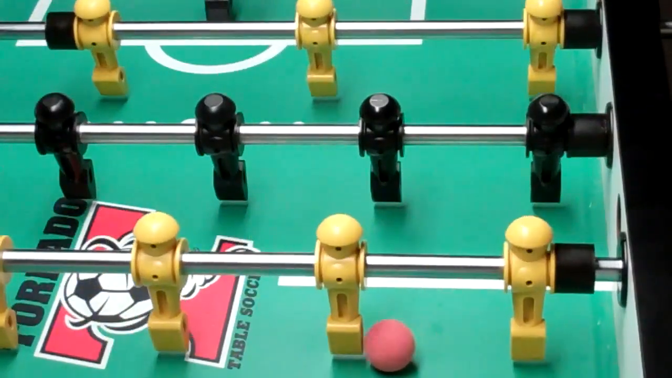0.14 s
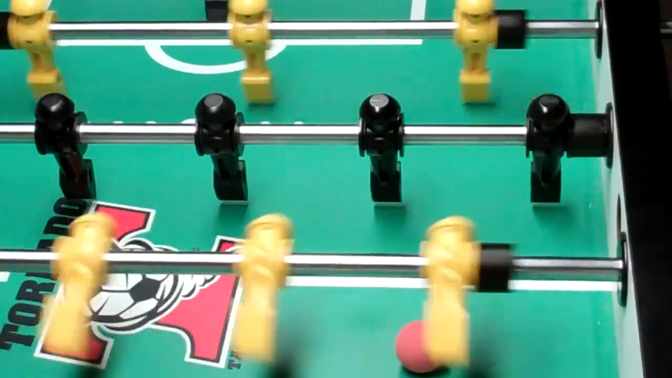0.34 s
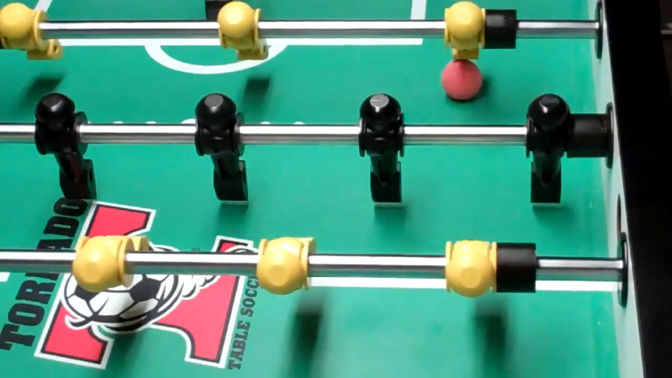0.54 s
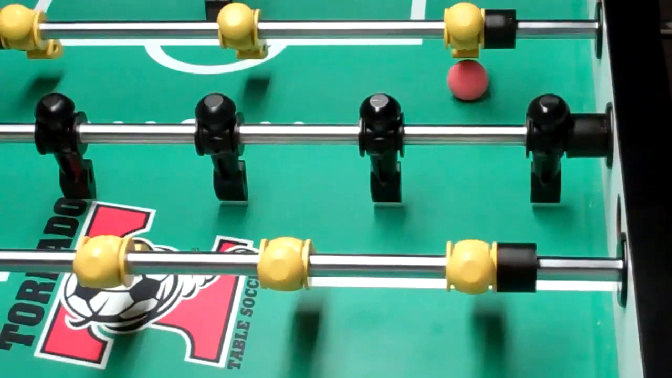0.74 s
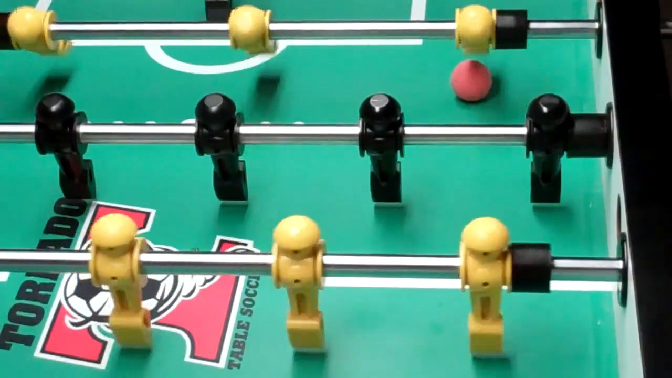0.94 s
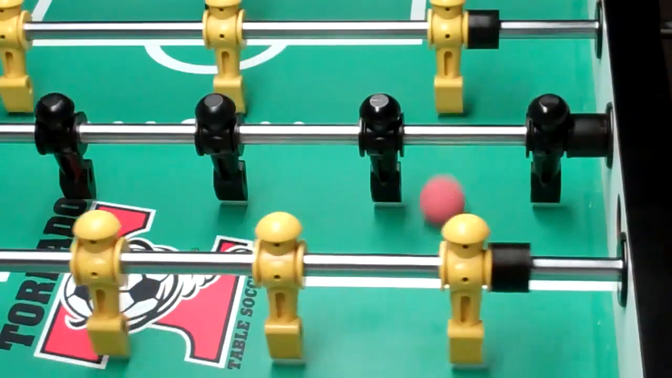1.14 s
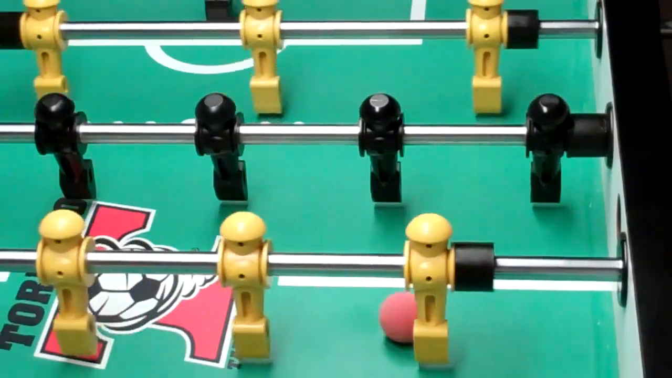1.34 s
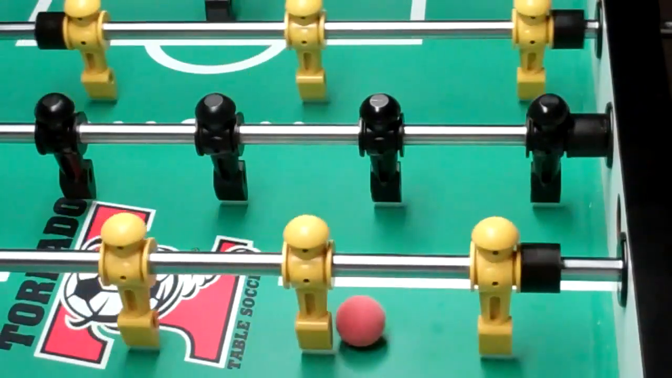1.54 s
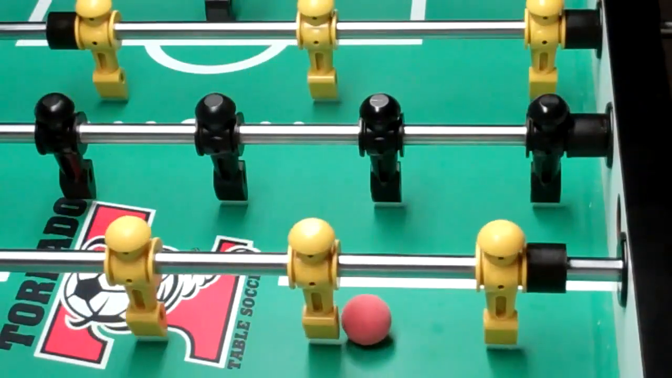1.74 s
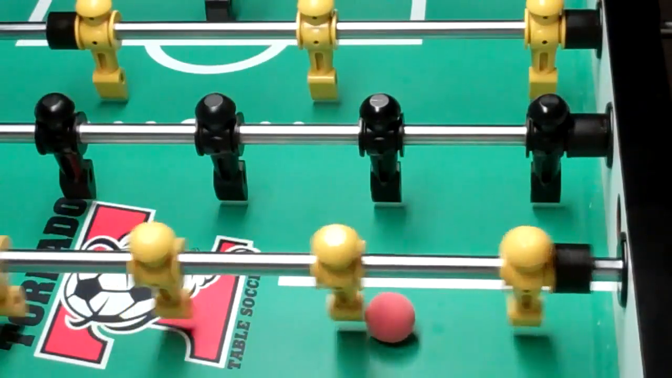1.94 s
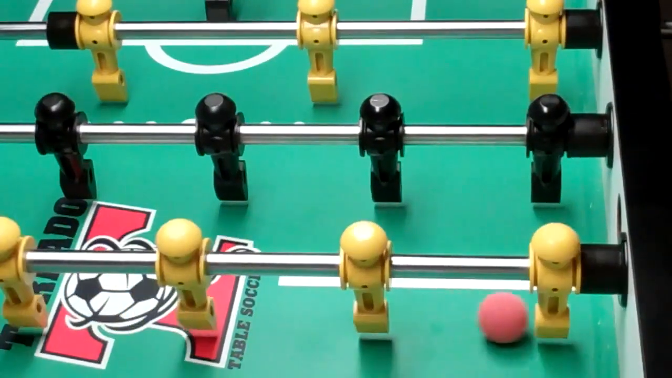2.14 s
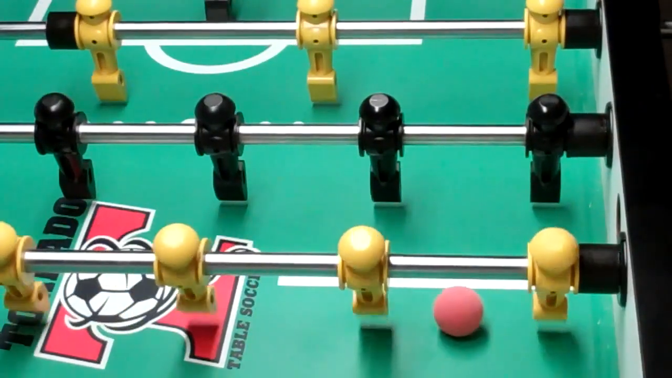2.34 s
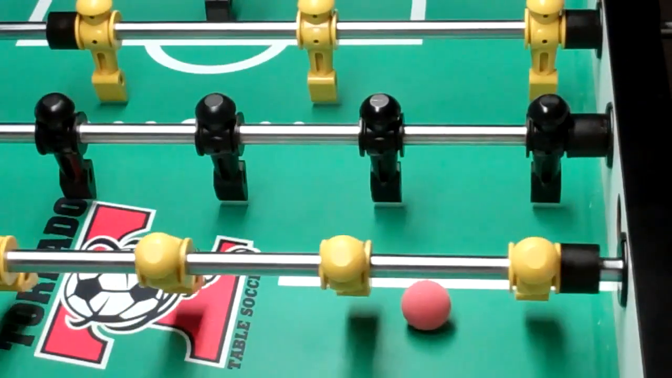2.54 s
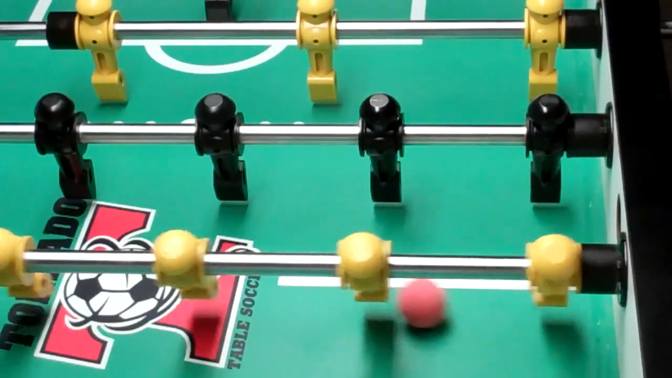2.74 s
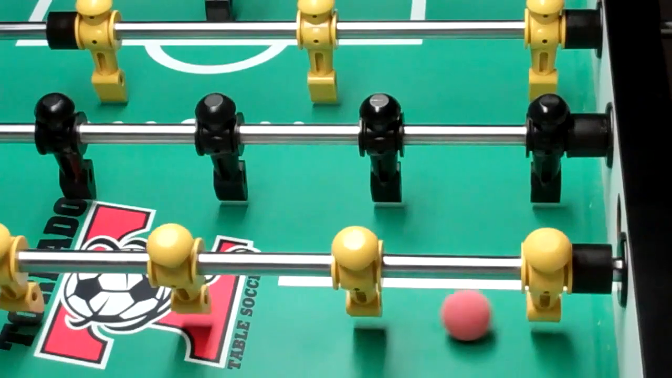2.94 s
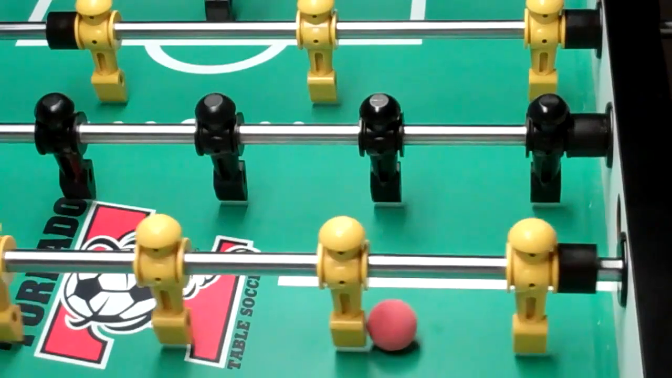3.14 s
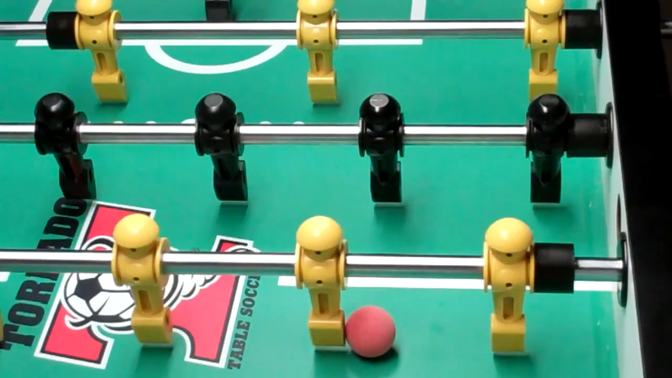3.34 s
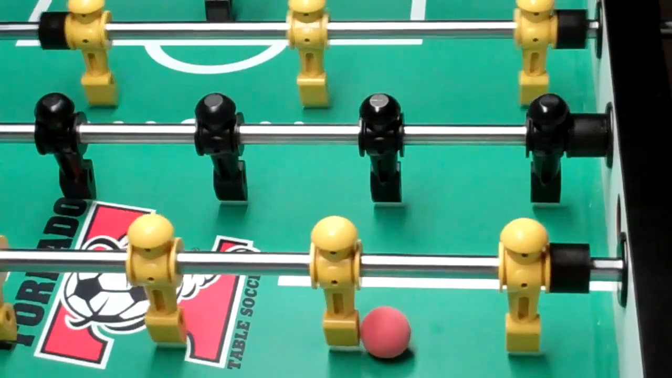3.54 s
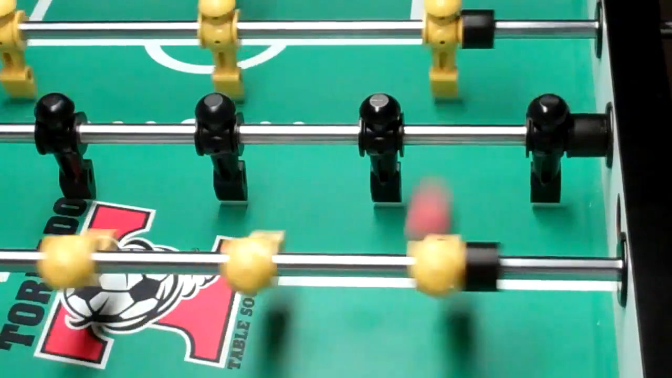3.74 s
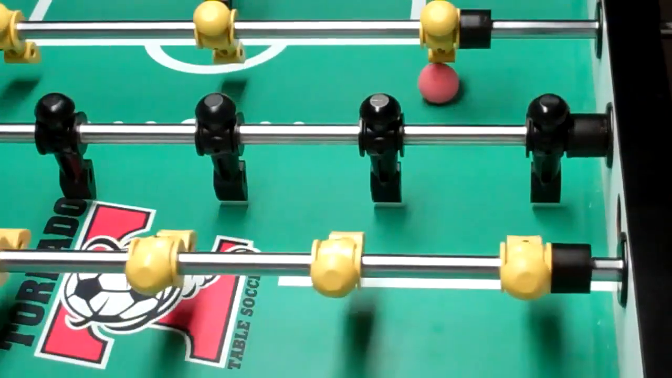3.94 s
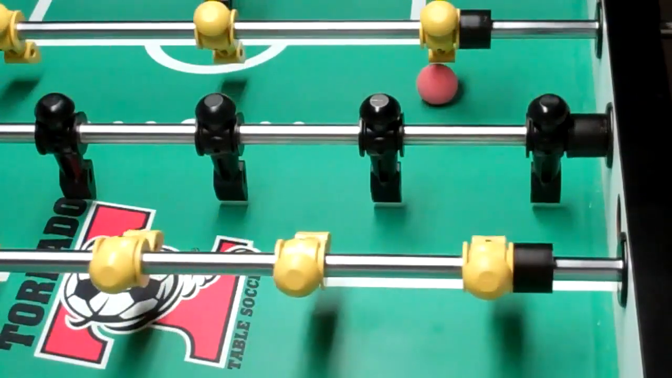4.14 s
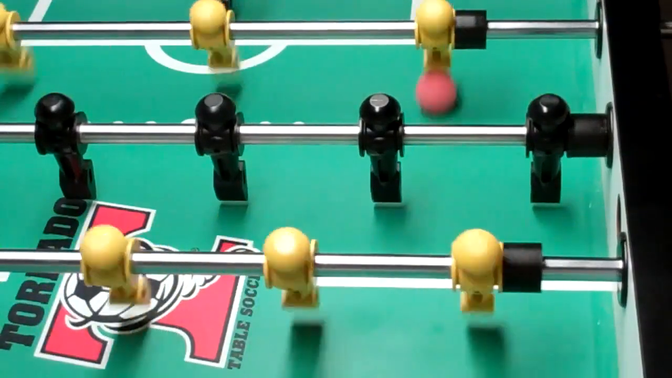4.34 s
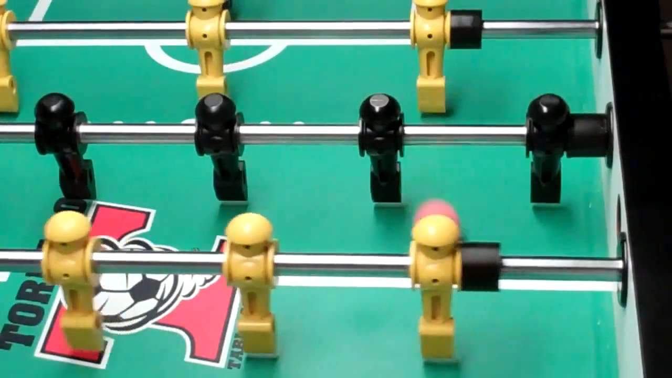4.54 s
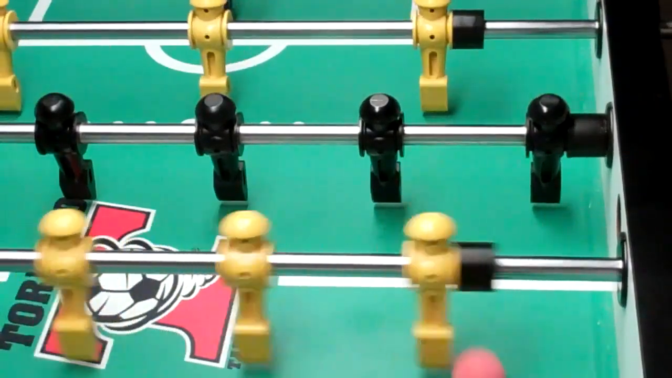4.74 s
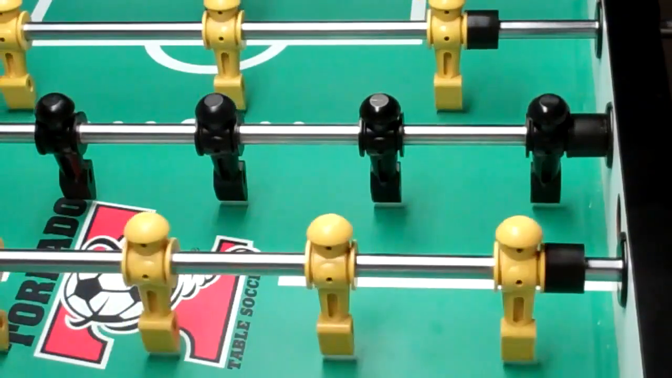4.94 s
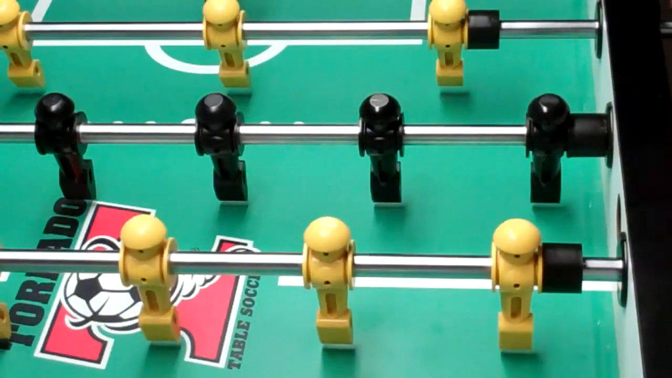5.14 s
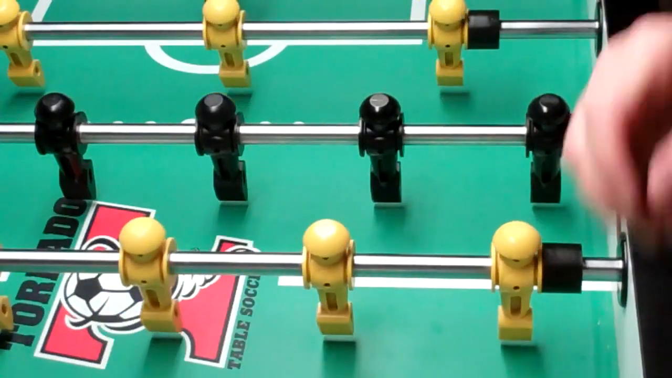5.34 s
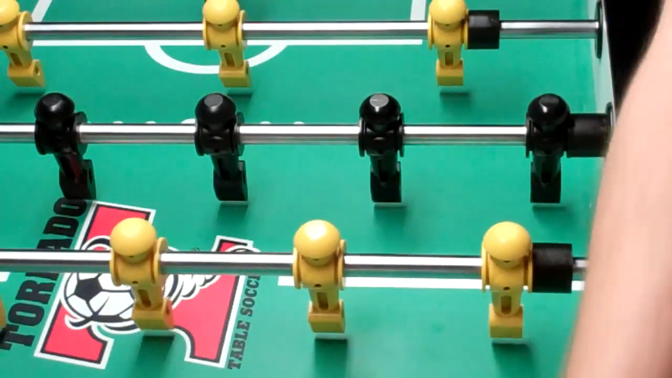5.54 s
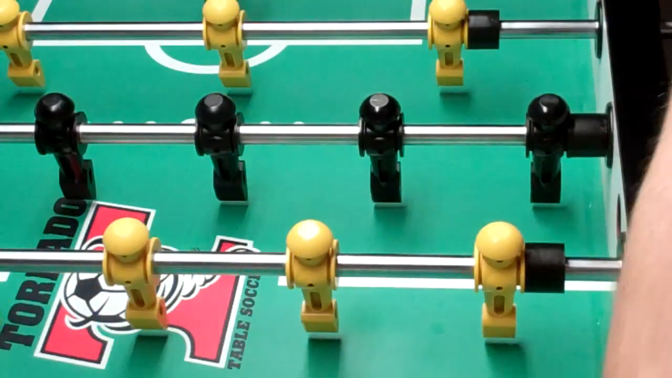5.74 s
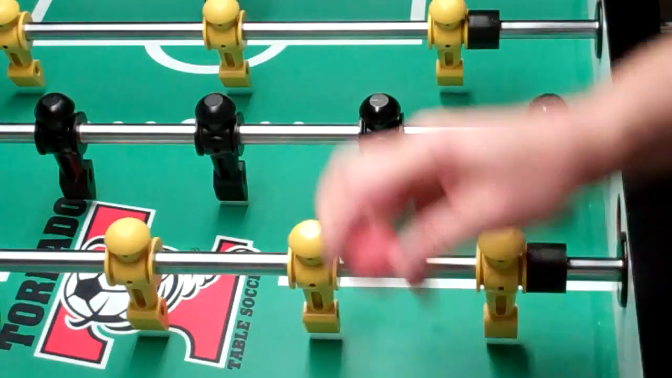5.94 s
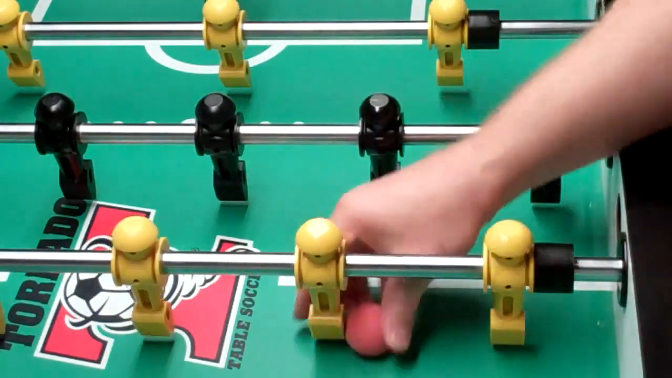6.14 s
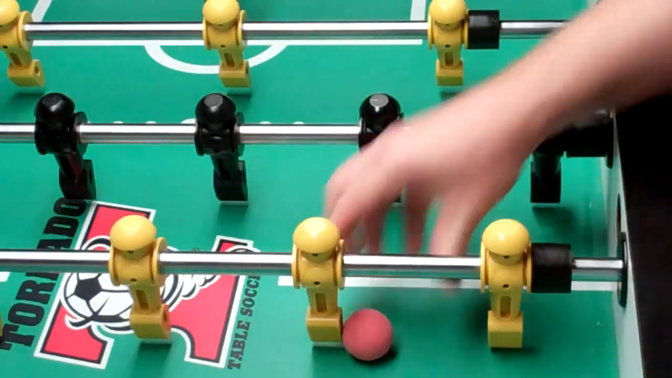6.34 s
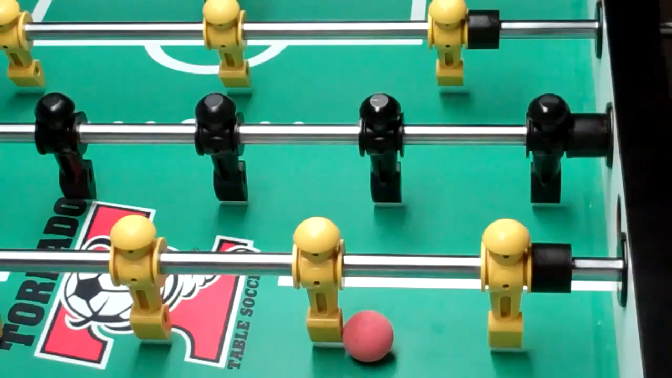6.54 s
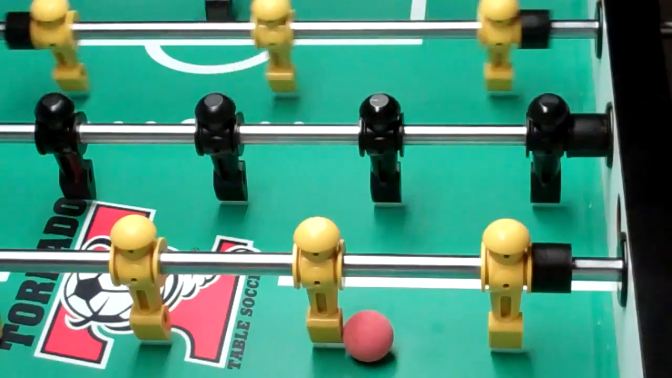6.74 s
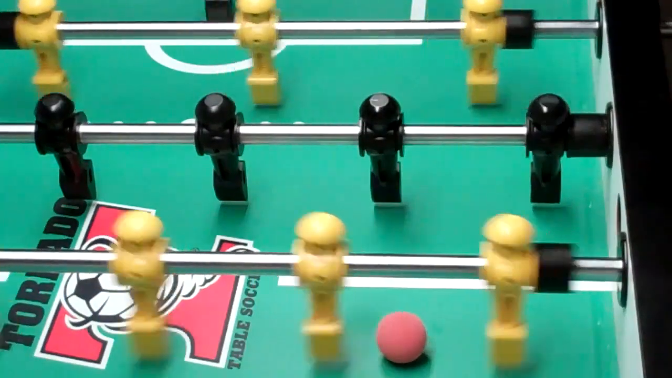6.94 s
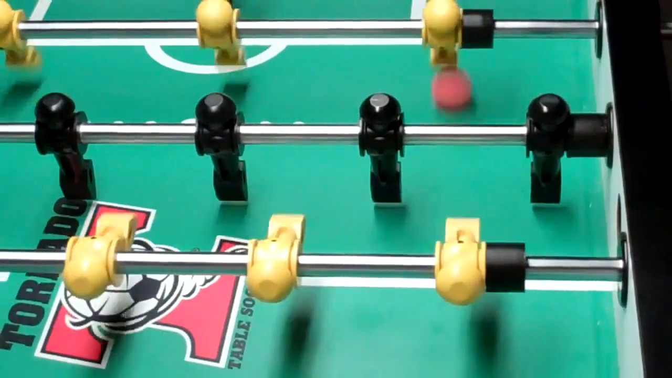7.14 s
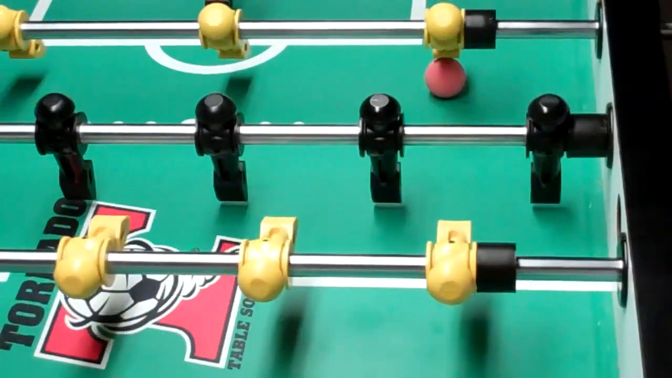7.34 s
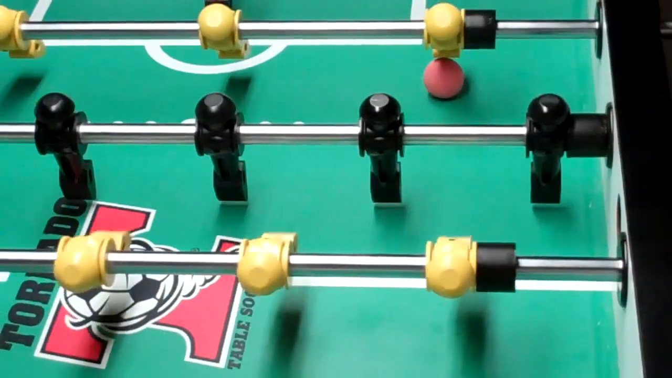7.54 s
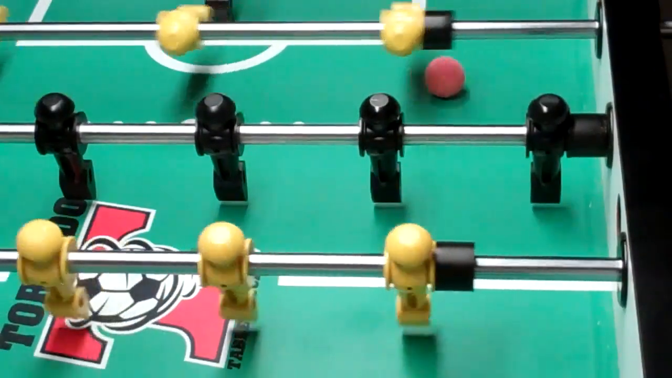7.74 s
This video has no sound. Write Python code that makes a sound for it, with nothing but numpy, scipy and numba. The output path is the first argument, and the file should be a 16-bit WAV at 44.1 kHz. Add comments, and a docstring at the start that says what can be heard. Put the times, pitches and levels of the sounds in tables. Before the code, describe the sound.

Light rod taps lead into two hard, clicking hits almost together, the wooden table ringing beneath. Steel rods clatter and hiss in their bearings while the ball is positioned, then another double strike and a fading roll. After a lull with faint knocks, skin rustles as the ball is replaced with a tap, rods rattle and a final pair of cracks lands. Close phone pickup in a small quiet room, briefly ducking after hits.

```python
"""Quiet room, table football close to a phone: plastic figures kick a hard ball over a hollow wooden table.
Kicks are clicks and rings of close modes; steel rods knock and tick in their bearings as rattled mode clusters.
Sliding rods and the rolling ball are friction grains through the table's modes; a slow rod sings on a rod mode.
A hand puts the ball back (grainy bright noise); room tone is coloured noise and two faint hums.
The phone's gain control ducks after each loud kick."""
import sys
import numpy as np
from scipy import signal
from scipy.fft import rfft, irfft, next_fast_len
from scipy.io import wavfile
from scipy.ndimage import uniform_filter1d
from numba import njit

SR = 44100
rng = np.random.default_rng(int(sys.argv[2]) if len(sys.argv) > 2 else 0)


def generate_wav(signal):
    """Clip the signal to [-1, 1] and save it as 16-bit WAV at the path in sys.argv[1]."""
    frames = np.transpose(np.atleast_2d(signal))
    scaled = np.clip(frames, -1, 1) * 32767
    pcm = np.round(scaled).astype(np.int16)
    wavfile.write(sys.argv[1], SR, pcm)


N = 342657

# ball against figure, wall or field: start_s, crack_db, crack_hz, snap_db, clatter_db,
# table_db, table_centre_hz, table_t60_s (at 500 Hz), thud_db
KICK_EVENTS = [(0.5275, 10.5, 3570, -7, -19, -2, 650, 0.1, -25),
               (0.609, 12.5, 2130, -6.5, -13, -4, 1210, 0.18, -26.5),
               (1.0903, -4, 1760, -35, -12.5, -11, 570, .16, -12.5),
               (1.4472, -17.5, 4200, -34, -25, -15.5, 790, 0.29, -29),
               (3.846, 8, 3800, -6, -16, -3, 620, 0.061, -24.5),
               (3.93, 11, 2134, -10, -20.5, -1.5, 1175, .12, -19.5),
               (4.4669, 1, 1840, -26.5, -22, -9, 555, 0.14, -21.5),
               (5.533, -6, 2325, -27.5, -17, -35, 1230, 0.52, -42.5),
               (6.0241, -20.5, 2700, -19, -26.5, -40, 1270, 0.085, -40.5),
               (6.2558, -0.5, 1637, -28.5, -26, -10.5, 850, 0.15, -31),
               (7.194, 9.5, 4530, -5, -20, -2.5, 650, 0.061, -26),
               (7.278, 9, 2256, -8.5, -14, -1.5, 1154, 0.12, -24.5)]
# resonances of the wooden table: centre_hz, half_width_hz, level_db
TABLE_MODES = [(140, 24, -9), (261.2, 5.6, -6.5), (339, 60, -11.5), (423, 50, -5), (522.5, 40, -9.5),
               (621.4, 56, 0), (742.6, 38, -3), (890.3, 80, -1.5), (1123.7, 84, -3), (1244.5, 170, -3),
               (1503, 110, -5.5), (1726, 15, -8.5), (1950, 53, -6), (2340, 160, -10.5), (2560, 83, -15),
               (3100, 570, -19.5)]
# resonances of a steel rod: centre_hz, half_width_hz, level_db
ROD_MODES = [(474.8, 30, -3.5), (1047, 87, -1), (2220, 38, -13), (2290, 64, -12), (2550, 30, -22),
             (3040, 60, -28), (4180, 52, -24.5), (4510, 54, -32.5)]


def undb(db):
    """dB to gain."""
    return 10 ** (np.asarray(db) / 20)


def unit(x):
    """Scaled to rms 1."""
    return x / np.sqrt(np.mean(x ** 2))


def colour(x, points):
    """Shapes the spectrum by (Hz, dB) points joined over log frequency."""
    size = next_fast_len(x.shape[-1])
    hz, db = np.transpose(points)
    bin_hz = np.arange(size // 2 + 1) * SR / size
    gain = undb(np.interp(np.log(bin_hz + 1), np.log(hz), db))
    return irfft(rfft(x, size) * gain, size)[..., :x.shape[-1]]


def band(x, lo_hz, hi_hz):
    """Band-pass, upper edge at most 0.45 SR."""
    sos = signal.butter(2, [lo_hz, min(hi_hz, 0.45 * SR)], "band", fs=SR, output="sos")
    return signal.sosfilt(sos, x)


def fade(t_s, t60_s):
    """Exponential decay, 60 dB in t60_s."""
    return np.exp(-np.log(1000) * t_s / t60_s)


def walk(rate_hz):
    """Random levels drawn at rate_hz, slewed from one to the next; spread near 1."""
    hold = int(SR / rate_hz)
    steps = np.repeat(rng.standard_normal(N // hold + 1), hold)
    return uniform_filter1d(steps, hold)[:N]


def hump(peak_s, rise_s, fall_s):
    """Gain that swells to 1 at peak_s and fades, 24.5 dB over the rise and over the fall."""
    t = np.arange(N) / SR
    return undb(-24.5 * np.maximum((peak_s - t) / rise_s, (t - peak_s) / fall_s))


def ring(peaks, centre_hz, t60_s, octaves=1.5, count=5):
    """One blow: clusters of close modes, loudest near the centre; high ones die first (t60_s at 500 Hz)."""
    hz, half_width_hz, db = np.transpose(peaks)[:, :, None, None]
    t = np.arange(int(min(1.3 * t60_s, 0.3) * SR)) / SR
    spot, size = rng.uniform(-1, 1, (2, len(peaks), count, 1))
    focus_db = -6 * (np.log2(hz / centre_hz) / octaves) ** 2
    weight = undb(db + focus_db) * np.sign(size) * (0.6 + 0.4 * np.abs(size))
    mode_hz = hz + spot * np.maximum(half_width_hz, 0.021 * hz)
    clusters = np.sum(weight * np.sin(2 * np.pi * mode_hz * t), axis=1)
    y = np.sum(clusters * fade(t, t60_s * (hz[:, 0] / 500) ** -0.3), axis=0)
    return y / np.sqrt(np.sum(weight ** 2))


def add(out, start_s, x):
    """Mixes x into out at start_s."""
    i = int(start_s * SR)
    out[i:i + len(x)] += x[:N - i]


def air():
    """Room tone: wavering coloured noise, wider in the treble, with two faint wavering hums."""
    # noise spectrum: hz, relative_db
    air_shape = [(15, -34), (25, -1.5), (87, -36), (108, -22), (165, -13), (193, -16), (303, -12.5),
                 (395, -21), (1030, -18), (1140, -20), (1840, -25), (14200, -24)]
    # side channel against mid: hz, side_gain_db
    side_shape = [(60, -17), (250, -9.5), (1000, -2), (4000, 4), (12000, 1)]
    # hums, each wavering around its level: hz, rms_db
    hums = [(120, -72), (166, -76.5)]
    t = np.arange(N) / SR
    mid, side = colour(rng.standard_normal((2, N)), air_shape)
    scale = undb(-58.5 + walk(2.4)) / np.std(mid)
    side = colour(side, side_shape)
    hum = 0
    for hz, db in hums:
        hum = hum + undb(db + 2 * walk(3)) * np.sqrt(2) * np.sin(2 * np.pi * hz * t)
    return scale * np.array([mid + side, mid - side]) + hum


def motion():
    """Gains of rumble, hiss and sway: slides swell and fade, rolls start and stop, kicks jolt the cabinet."""
    # constant floor under all motion: rumble_db, hiss_db, sway_db
    rest_db = (-74.5, -65.5, -72)
    # rods pushed through their bearings: fastest_s, rise_s, fall_s, rumble_db, hiss_db, sway_db
    slides = [(0.48, 0.26, 0.087, -45, -47.5, -58), (0.97, 0.074, 0.33, -45, -52.5, -73),
              (1.48, 0.025, 0.089, -47, -41, -63), (2.162, 0.046, 0.079, -54.5, -30.5, -38.5),
              (2.94, 0.1, 0.13, -37.5, -42.5, -42.5), (3.8, 0.1, 0.095, -29.5, -38, -47),
              (4.372, 0.055, .08, -48.5, -53, -70), (4.85, 0.071, .08, -72, -63, -51),
              (5.07, 0.088, .12, -45, -53.5, -61.5), (6.831, 0.071, 0.073, -25, -33.5, -43),
              (7.12, 0.11, 0.21, -40, -46, -56), (7.76, 0.37, 0.12, -59, -50, -71.5)]
    # the ball rolling: start_s, length_s, start_rumble_db, end_rumble_db
    rolls = [(0.518, 0.15, -26, -22), (0.626, 0.32, -54.5, -56), (1.1, 0.73, -39.5, -61.5),
             (3.05, 0.23, -56, -75), (3.846, 0.086, -17.5, -42), (3.933, 0.26, -32, -62),
             (4.46, 1.42, -41.5, -61), (6.297, 0.24, -61.5, -64), (6.9, 0.39, -59, -35),
             (7.201, 0.073, -32, -42), (7.3, 0.27, -29, -67)]
    roll_edge_s, roll_hiss_db = 0.029, -19  # hiss relative to rumble
    jolt_db, jolt_t60_s = -39, 0.24  # relative to the kick's table ring
    t = np.arange(N) / SR
    gains = undb(rest_db)[:, None] * np.ones(N)
    for peak_s, rise_s, fall_s, *db in slides:
        gains = gains + undb(db)[:, None] * hump(peak_s, rise_s, fall_s)
    for start_s, length_s, start_db, end_db in rolls:
        stop_s = start_s + length_s
        on = np.clip(np.minimum(t - start_s, stop_s - t) / roll_edge_s + 0.5, 0, 1)
        roll = on * undb(np.interp(t, [start_s, stop_s], [start_db, end_db]))
        gains = gains + roll * np.array([[1], [undb(roll_hiss_db)], [0]])
    for start_s, _, _, _, _, table_db, *_ in KICK_EVENTS:
        add(gains[2], start_s, undb(table_db + jolt_db) * fade(t[:SR // 2], jolt_t60_s))
    return gains


def rub():
    """Uneven grains of friction shake the table, hiss on the steel and rock the cabinet."""
    # friction hiss spectrum: hz, gain_db
    hiss_shape = [(1500, -12), (2200, -5.5), (3600, -10), (5000, -10), (8000, -7), (12000, -4.5),
                  (15000, -10)]
    rumble_gain, hiss_gain, sway_gain = motion()
    rumble = 0
    # the contact wanders over the board, so different groups of modes take turns
    for centre_hz in (390, 620, 950):
        grains = rng.standard_normal(N) * rumble_gain * undb(6.2 * walk(60) + 3.5 * walk(14))
        body = ring(TABLE_MODES, centre_hz, 0.097, octaves=0.68, count=8)
        body = body / np.sqrt(np.sum(body ** 2))
        rumble = rumble + 0.48 * signal.fftconvolve(grains, body)[:N]
    grainy = band(rng.standard_normal(N), 870, 8300) * undb(2.3 * walk(150))
    hiss = unit(colour(grainy, hiss_shape))
    sway = unit(band(rng.standard_normal(N), 25, 80))
    return rumble + hiss_gain * hiss + sway_gain * sway


def knocks():
    """A short rattle of contacts rings rod and table; metal ticks and scrapes on the bearing."""
    # rods knocking in their bearings, soft touches of the ball:
    # start_s, ring_db, ring_centre_hz, tick_db, rattle_ms
    knock_events = [(0.295, -22, 574, -66.5, 7.3), (0.32, -24, 546, -43.5, 13), (0.386, -21, 497, -53, 18),
                    (0.432, -25, 436, -42, 17), (0.477, -16, 595, -43, 11), (0.958, -31.5, 480, -55.5, 9.2),
                    (0.996, -38.5, 585, -62, 25), (1.084, -28, 900, -59, 5), (1.451, -10, 1254, -25, 21),
                    (1.657, -21.5, 616, -55, 25), (1.801, -31, 520, -67.5, 13.3),
                    (1.478, -14, 1298, -43, 13), (2.088, -21, 494, -32, 14),
                    (2.121, -13.5, 498, -28.5, 4.7), (2.143, -20.5, 261, -24.5, 7.8),
                    (2.151, -8.5, 640, -30, 28), (2.269, -14.5, 1090, -30.5, 22.6),
                    (2.865, -16.5, 474, -30, 7.1), (2.917, -16.5, 440, -34, 17),
                    (3.008, -13.5, 1053, -26, 23.5), (3.28, -34.5, 479.5, -64, 16),
                    (3.387, -44, 477, -71, 8.3), (3.633, -21, 487, -41, 9.6), (3.724, -15.5, 479, -37, 9.5),
                    (3.758, -12.5, 477, -30.5, 18), (3.8, -17, 457, -35, 24), (4.317, -39.5, 398, -66, 16),
                    (4.376, -28, 435, -56, 16), (4.614, -26.5, 495, -48, 14),
                    (4.924, -33.5, 593, -67.5, 12), (5.036, -26, 560, -49, 13),
                    (5.31, -25.5, 637, -46.5, 11.3), (5.498, -41, 1500, -50.5, 8.3),
                    (5.608, -26.5, 500, -53.5, 16), (5.727, -43.5, 995, -52, 8.6),
                    (5.772, -41.5, 444, -45, 33), (5.945, -44, 590, -38.5, 16), (6.38, -36.5, 866, -55, 10),
                    (6.54, -33.5, 472, -72, 8.2), (6.778, -13, 483, -39, 27),
                    (6.805, -13.5, 393, -34.5, 20), (6.961, -21.5, 470, -45, 7.3),
                    (7.052, -20.5, 500, -42.5, 6.8), (7.084, -24.5, 423, -40.5, 16),
                    (7.145, -20, 486, -46, 28), (7.495, -50, 600, -53, 3)]
    rod_share, scrape_db = 0.51, -14.5  # rod's part of the ring; scrape relative to tick
    out, t = np.zeros(N), np.arange(int(0.2 * SR)) / SR
    bodies = (rod_share, ROD_MODES, 0.1), (1 - rod_share, TABLE_MODES, 0.08)
    for start_s, db, centre_hz, tick_db, rattle_ms in knock_events:
        noise = rng.standard_normal((3, len(t)))
        swell = (t + 0.001) * np.exp(-t * 3000 / rattle_ms)
        rattle = noise[0] * swell / np.sqrt(np.sum(swell ** 2))
        rattle[0] = 0.44  # the first contact
        for share, peaks, t60_s in bodies:
            body = ring(peaks, centre_hz, t60_s, octaves=1.2, count=9)
            add(out, start_s, undb(db) * share * signal.fftconvolve(body, rattle))
        tick = unit(band(noise[1], 1300, 4400)) * fade(t, 0.0063 + 0.0048 * rattle_ms)
        scrape = unit(band(noise[2], 6100, 19000)) * fade(t, 0.014 + 0.0043 * rattle_ms)
        add(out, start_s, undb(tick_db) * tick)
        add(out, start_s, undb(tick_db + scrape_db) * scrape)
    return out


def kicks():
    """A click rings the hard plastic for a few cycles; a broad snap, loose parts clatter, the table rings."""
    # resonances of a plastic figure: centre_hz, half_width_hz, level_db
    figure_modes = [(1394, 220, -1), (1995, 250, 0), (2697, 150, -5), (3520, 380, -5), (4480, 370, -4.5),
                    (5070, 440, -1.5), (6220, 560, -11)]
    crack_t60_s = 0.031
    thud_hz, thud_t60_s = 175, 0.065  # the hollow of the cabinet
    out, t = np.zeros(N), np.arange(int(0.25 * SR)) / SR
    impulse = np.eye(1, len(t))[0]
    for start_s, db, hz, snap_db, clatter_db, table_db, centre_hz, t60_s, thud_db in KICK_EVENTS:
        noise = rng.standard_normal((2, len(t)))
        crack = ring(figure_modes, hz, crack_t60_s, octaves=0.89, count=10)
        click = band(impulse, 0.25 * hz, 1.85 * hz)
        snap = unit(band(noise[0], 4400, 0.45 * SR)) * fade(t, 0.01)
        loose = band(noise[1], 0.3 * hz, 1.4 * hz)
        loose = band(loose, 300, 1.5 * hz)
        loose = band(loose, 200, 1.2 * hz)
        clatter = unit(loose) * fade(t, 0.15)
        add(out, start_s, undb(db) * crack)
        add(out, start_s, undb(db + 11) * click)
        add(out, start_s, undb(snap_db) * snap)
        add(out, start_s, undb(clatter_db) * clatter)
        add(out, start_s, undb(table_db) * ring(TABLE_MODES, centre_hz, t60_s, octaves=0.93, count=8))
        add(out, start_s, undb(thud_db) * ring(TABLE_MODES, thud_hz, thud_t60_s, octaves=0.58))
    return out


def creep():
    """A slowly creeping rod sings: faint friction noise through a narrow part of its modes."""
    # start_s, length_s, rms_db before the fades, centre_hz
    creeps = [(2.6, .26, -60, 1050), (6.655, 0.11, -57, 2200)]
    out = np.zeros(N)
    for start_s, length_s, db, centre_hz in creeps:
        noise = rng.standard_normal(int(length_s * SR))
        body = ring(ROD_MODES, centre_hz, 0.06, octaves=0.25)
        song = signal.fftconvolve(noise, body)[:len(noise)]
        add(out, start_s, undb(db) * unit(song) * signal.windows.tukey(len(noise), 0.4))
    return out


def brush():
    """A hand brushes ball and table edge: bright, grainy skin noise."""
    # loudest_s, rise_s, fall_s, level_db
    brushes = [(5.89, 0.14, 0.11, -38.5), (5.949, 0.046, .09, -37), (6.035, 0.016, .12, -38.5)]
    skin = band(rng.standard_normal(N), 2400, 16000)
    grain = unit(skin * undb(3 * walk(200)))
    return grain * sum(undb(db) * hump(peak_s, rise_s, fall_s) for peak_s, rise_s, fall_s, db in brushes)


def room(x):
    """Direct sound, a little earlier on the right, plus a diffuse tail that dies band by band."""
    # tail bands: hz, t60_s, mid_db, side_db
    tail_bands = [(216, 0.35, 4, -17), (443, 0.34, -3, -15.5), (1000, 0.29, -4.5, -9),
                  (2200, 0.42, -16, -10), (5300, 0.27, -10.5, -11.5), (10900, 0.064, -2, -0.5)]
    t = np.arange(int(0.5 * SR)) / SR
    onset = np.minimum(t / 0.0093, 1)
    tail = 0
    for hz, t60_s, mid_db, side_db in tail_bands:
        noise = band(rng.standard_normal((2, len(t))), hz / 1.32, hz * 1.85) * fade(t, t60_s) * onset
        norm = np.sqrt(np.sum(noise ** 2, axis=1, keepdims=True) * SR / hz)
        tail = tail + undb([[mid_db], [side_db]]) * noise / norm
    mid, side = signal.fftconvolve(x[None], tail, axes=1)[:, :N]
    # a slope term in the side delays left and advances right by under a sample
    side = side + 0.37 * (np.roll(x, 1) - np.roll(x, -1))
    return np.array([x + mid + side, x + mid - side])


def scene():
    """All sources, slightly louder on the left; small parts radiate little bass."""
    left_db = 1.5  # left minus right
    blows = band(kicks() + knocks(), 110, 0.45 * SR)
    sound = room(blows + rub() + creep() + brush()) + air()
    return sound * undb([[left_db / 2], [-left_db / 2]])


@njit
def follow(x, attack, release):
    """Envelope that rises fast and falls slowly."""
    e, out = 0., np.empty(len(x))
    for i in range(len(x)):
        e += (x[i] - e) * (attack if x[i] > e else release)
        out[i] = e
    return out


def record(dry):
    """Microphone colour; gain control ducks after loud blows and creeps back; peaks clip; the top is cut."""
    # microphone response: hz, gain_db
    mic_shape = [(40, -3), (150, 6), (6000, -2.5), (8500, -4), (13000, 1)]
    attack_s, release_s, threshold_db, top_hz = 0.02, 0.25, -23, 14350
    sound = colour(dry, mic_shape)
    envelope = follow(np.abs(sound).mean(axis=0), 1 / (attack_s * SR), 1 / (release_s * SR))
    gain = np.minimum(undb(threshold_db) / (envelope + 1e-9), 1) ** 0.6
    clipped = np.clip(sound * gain, -0.98, 0.98)
    return signal.sosfilt(signal.ellip(10, 0.2, 75, top_hz, fs=SR, output="sos"), clipped)


dry = scene()
out = record(dry)
generate_wav(out)
```